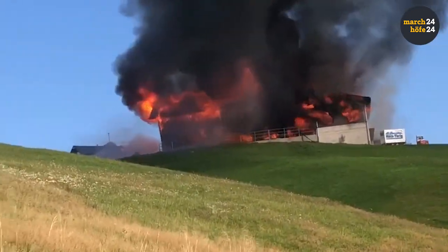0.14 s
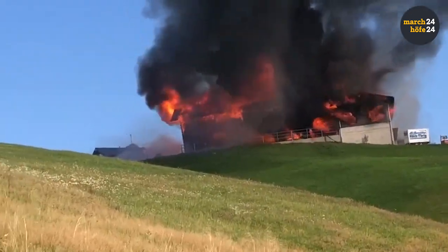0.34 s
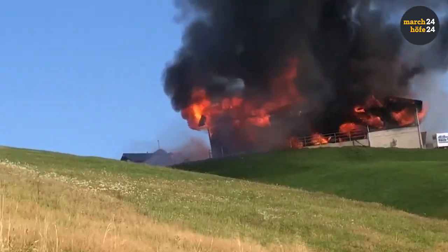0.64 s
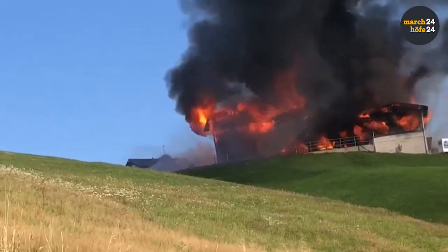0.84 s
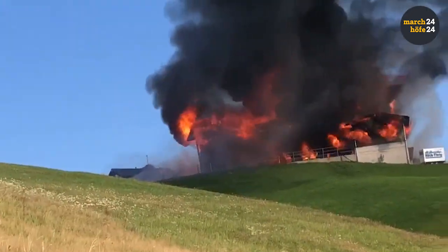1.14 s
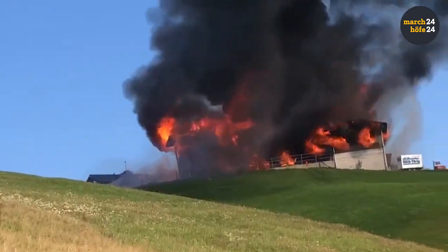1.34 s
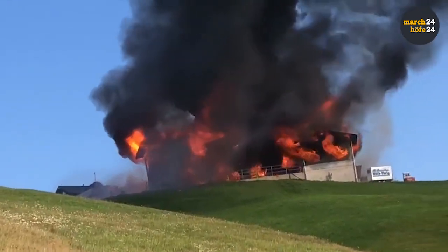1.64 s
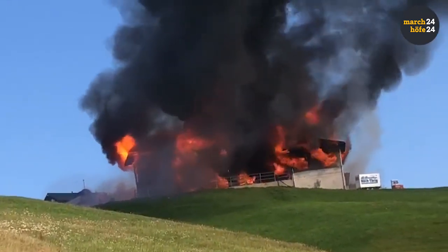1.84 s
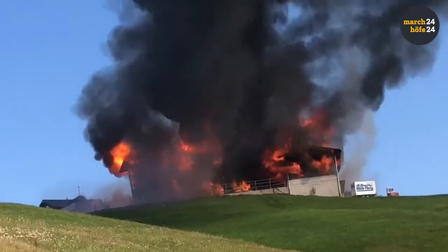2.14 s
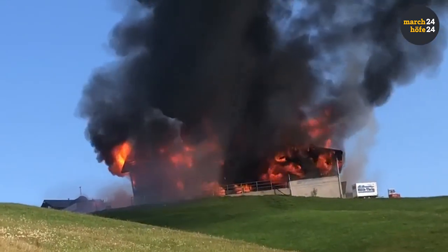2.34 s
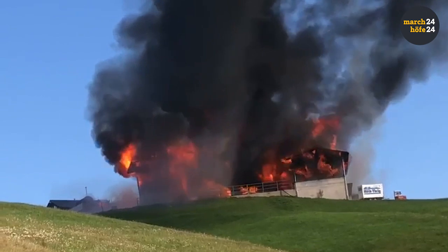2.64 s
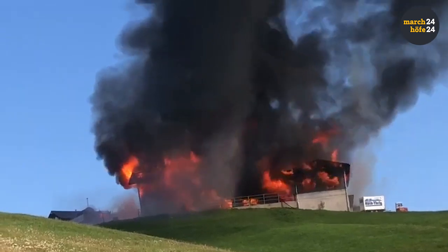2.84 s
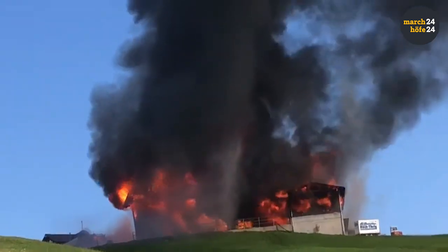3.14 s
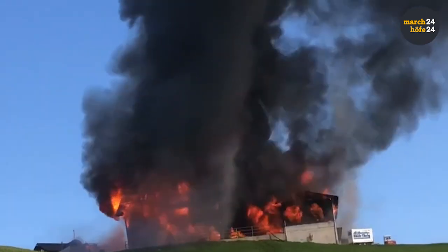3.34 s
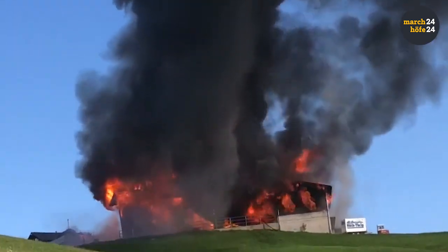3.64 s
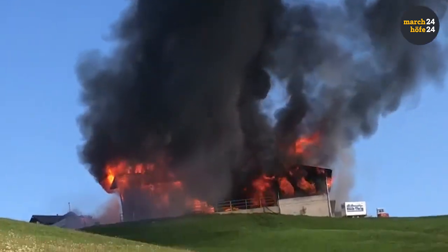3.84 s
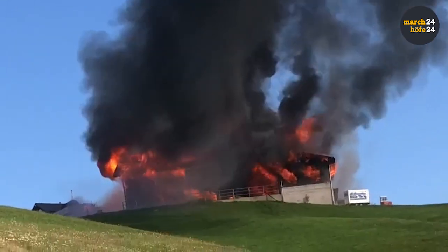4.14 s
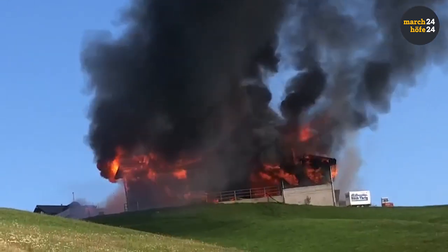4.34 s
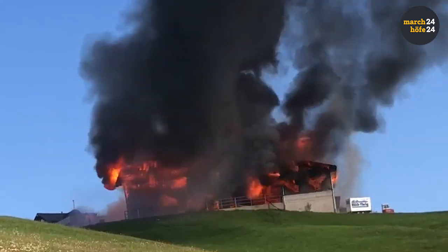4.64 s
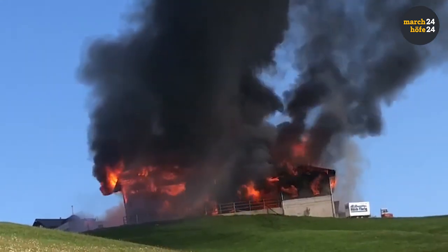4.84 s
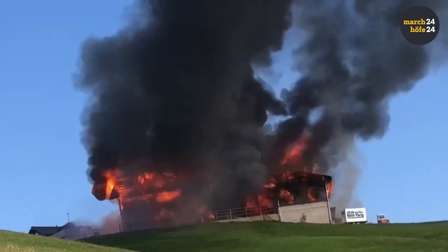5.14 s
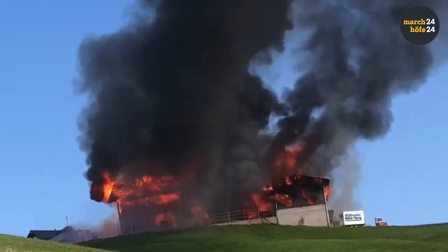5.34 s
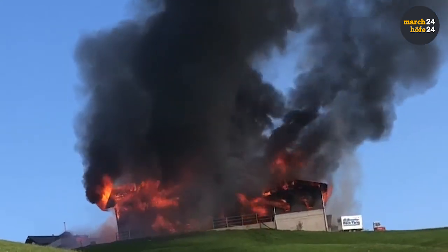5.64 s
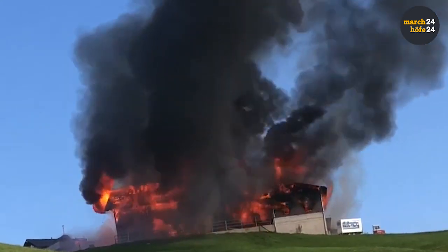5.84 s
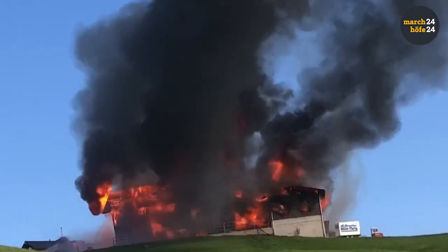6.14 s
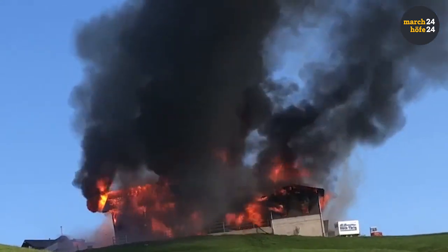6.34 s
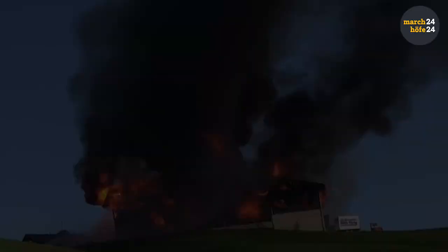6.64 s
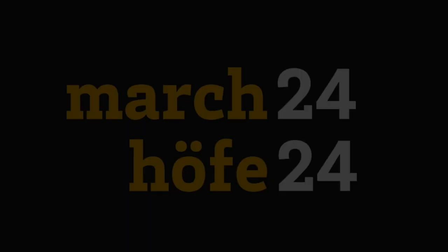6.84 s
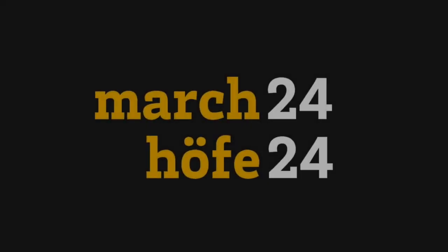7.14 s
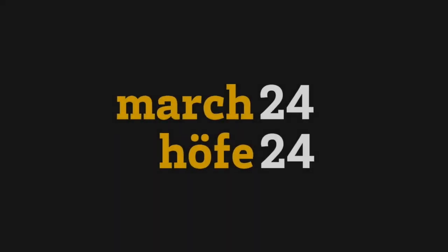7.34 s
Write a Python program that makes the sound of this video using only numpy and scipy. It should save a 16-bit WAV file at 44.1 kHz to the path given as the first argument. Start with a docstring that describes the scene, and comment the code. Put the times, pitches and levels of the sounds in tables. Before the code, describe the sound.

Distant blaze outdoors: steady muffled roar, dense wooden snaps and spark ticks, low engine drone underneath, crackling thickening towards the end, then silence.

```python
"""A barn burns on a hilltop across a meadow. From the start the blaze roars and hisses (flickering
bands of noise and clicks) over a low rumble (resonant noise) and a steady motor (harmonics).
Throughout, timbers pop (clean breaks and ringing sprays) and sparks tick (short treble noise).
Toward the end a rush of fine crackle swells (banded clicks and ringing splinters); then all
fades to silence."""
import sys
import numpy as np
from scipy import signal
from scipy.io import wavfile

SR = 44100
rng = np.random.default_rng(int(sys.argv[2]) if len(sys.argv) > 2 else 0)


def to_wav(s):
    """Save 16-bit WAV."""
    ch = np.atleast_2d(s).T  # columns
    pcm = np.round(np.clip(ch, -1, 1) * 32767)  # PCM
    wavfile.write(sys.argv[1], SR, pcm.astype(np.int16))


N = 330307

# blaze levels: time_s, roar_db, hiss_db
BLAZE_LEVELS = [(0.0, -39, -46.5), (0.49, -43, -49), (1.15, -43.5, -49.5), (2.07, -43.5, -46.5),
                (2.42, -46, -44), (3.19, -43.5, -48.5), (3.86, -41.5, -49), (4.19, -43, -52.5),
                (4.67, -43.5, -49.5), (4.89, -38, -47.5), (5.52, -43, -49), (5.92, -40.5, -50),
                (6.33, -38.5, -50.5), (6.48, -42, -48)]
# relative spectra of roar, hiss and rush: band_hz, density_db_per_hz
ROAR_SPECTRUM = [(140, -35), (230, 0.5), (250, 0), (361, 1), (520, 0), (695, 0.5), (1880, -8),
                 (3380, -12.5), (6000, -22), (7800, -47), (13200, -120)]
HISS_SPECTRUM = [(2500, -6.5), (4500, -11.5), (6300, -8), (8000, -18), (10000, -18), (12000, -24)]
RUSH_SPECTRUM = [(400, -20), (800, 1.5), (1500, 2), (2250, 2), (2900, -0.5), (3600, 0), (5000, -8),
                 (7000, -15.5), (10000, -47.5)]
# louder pops of bursting timber: start_s, length_ms, knock_hz, knock_db, crack_hz, crack_db
TIMBER_POPS = [(0.008, 44.5, 520, -45, 3300, -42.5), (0.023, 4.4, 860, -35, 3000, -31),
               (0.115, 4.9, 500, -30, 2600, -49), (0.137, 35, 840, -38, 2970, -43),
               (0.2657, 1.36, 1300, -26.5, 1860, -22), (0.2668, 1.2, 1050, -25, 1900, -39.5),
               (0.2676, 1.4, 1000, -41, 1900, -27), (0.269, 2.2, 750, -24, 1093, -33),
               (0.344, 5.8, 840, -53, 4460, -37.5), (0.391, 3.6, 750, -30, 3310, -38),
               (0.511, 4.1, 700, -29.5, 3870, -31), (0.589, 1.4, 540, -28, 2870, -50),
               (0.657, 33, 790, -42.5, 3280, -41), (0.828, 35, 799, -43, 4220, -41),
               (0.835, 2.5, 1120, -33, 4100, -34.5), (0.922, 22, 730, -36, 2180, -57),
               (1.022, 37, 770, -37, 2770, -57), (1.046, 1.5, 726, -27, 2590, -30),
               (0.875, 2.6, 800, -31, 2010, -34), (1.112, 3.8, 1000, -38, 2300, -35),
               (1.163, 2.9, 620, -28, 3580, -38), (1.176, 19, 900, -42, 3000, -38.5),
               (1.247, 3, 1410, -39, 2200, -44), (1.333, 36, 940, -39.5, 3520, -37),
               (1.339, 3.8, 900, -43, 2000, -32), (1.3535, 2, 1500, -34, 3260, -28.5),
               (1.513, 1.7, 800, -43, 4360, -34), (1.561, 6.54, 890, -37, 3900, -29.5),
               (1.579, 7.1, 1500, -30.5, 2660, -43), (1.592, 8.2, 1400, -28, 2800, -33),
               (1.604, 13, 1200, -32, 2200, -35), (1.628, 19, 1170, -34, 3180, -35),
               (1.702, 6.3, 536, -32, 3330, -34), (1.773, 5, 990, -46, 3180, -37),
               (1.797, 16, 95, -36, 3000, -60), (1.828, 6.7, 1034, -29, 2480, -37),
               (1.847, 8.8, 704, -36, 3680, -40), (1.984, 18, 800, -35, 2170, -36.5),
               (2.138, 1.8, 901, -50, 3430, -37), (2.171, 8.1, 702, -48, 4200, -36.5),
               (2.218, 21, 990, -33, 2900, -41), (2.221, 3.4, 1240, -30, 2300, -38.5),
               (2.2232, 2, 3300, -27.5, 4740, -28), (2.23, 3.4, 925, -21, 2870, -42),
               (2.235, 5.7, 1200, -30.5, 2200, -39), (2.245, 4.9, 1200, -38, 2300, -44),
               (2.261, 2.1, 1050, -17, 2480, -22), (2.287, 10, 855, -31.5, 2540, -30.5),
               (2.335, 13, 720, -41, 3700, -36), (2.478, 42, 940, -36.5, 3300, -42.5),
               (2.542, 2.84, 800, -41, 3600, -29), (2.551, 3.6, 1190, -28, 3770, -29),
               (2.686, 21, 750, -34.5, 3060, -41), (2.7078, 2.6, 800, -21.5, 3080, -39),
               (2.737, 9, 1900, -31.5, 3300, -37), (2.77, 6.4, 1180, -36, 3970, -35.5),
               (2.953, 23.3, 610, -35.5, 3010, -55), (2.995, 5.4, 855, -31, 3036, -29),
               (3.015, 7, 1010, -29, 1990, -26), (3.022, 3.16, 820, -20.5, 2130, -24.5),
               (3.0245, 5, 1500, -31, 4000, -35), (3.028, 2.5, 995, -34, 2180, -35),
               (3.034, 4.8, 1193, -35, 2200, -37), (3.047, 7.3, 1150, -29, 2000, -42),
               (3.06, 16, 1100, -37.5, 2240, -42), (3.108, 3.2, 665, -28.5, 3680, -31),
               (3.184, 2.2, 904, -36, 3780, -31), (3.218, 16, 1110, -36, 2620, -35),
               (3.2225, 3.24, 870, -23, 2500, -30), (3.228, 4, 1400, -42, 2100, -30),
               (3.271, 3.3, 1304, -30, 2200, -24), (3.275, 5.6, 896, -30, 1700, -35),
               (3.294, 8.5, 1380, -31, 3020, -37), (3.2975, 3.7, 910, -25.5, 2463, -41),
               (3.306, 6, 1200, -43, 2484, -46), (3.326, 3.7, 1000, -48, 4000, -35),
               (3.368, 13, 590, -36, 3000, -51), (3.385, 22, 666, -36, 2920, -54),
               (3.392, 3, 1500, -33.5, 3300, -32), (3.405, 2.8, 680, -21.5, 3000, -45),
               (3.419, 3, 1000, -33, 2000, -30), (3.425, 9, 720, -36.5, 2800, -37),
               (3.491, 29, 680, -32.5, 3130, -47.5), (3.521, 2, 1010, -25, 1690, -25),
               (3.539, 1.2, 1090, -26.5, 3140, -31), (3.586, 9, 1200, -31, 2900, -34),
               (3.598, 4, 1280, -29.5, 2400, -42), (3.607, 6, 1300, -33, 3300, -34),
               (3.627, 2, 1400, -32, 3800, -29.5), (3.637, 2.4, 936, -23.5, 2500, -31.5),
               (3.653, 2.7, 850, -34, 3190, -42), (3.671, 5, 1210, -31, 2820, -31),
               (3.675, 1.74, 1010, -26, 4500, -29), (3.727, 3.4, 770, -39, 3400, -29),
               (3.791, 3.1, 750, -38, 4910, -29.5), (3.802, 8.1, 523, -28.5, 3340, -40),
               (3.814, 8, 573, -33, 3000, -50), (3.834, 4, 1200, -33, 2200, -35),
               (3.838, 12, 1050, -29, 2870, -35), (3.899, 3.6, 796, -28.5, 3000, -42),
               (3.9334, 2, 835, -22.5, 1950, -27), (3.934, 10, 700, -36, 3300, -32),
               (3.939, 5, 1500, -31.5, 2300, -34), (3.948, 5, 850, -29, 3000, -37.5),
               (3.997, 7.6, 1500, -33, 4500, -30), (3.9995, 4.5, 1200, -28, 2580, -25),
               (4.009, 26, 540, -33.5, 3320, -57), (4.044, 9, 900, -36, 2800, -35),
               (4.064, 7.5, 1100, -31, 2760, -34), (4.271, 30.7, 1030, -38, 3420, -38),
               (4.349, 32, 550, -38.5, 2910, -40), (4.454, 21, 740, -35.5, 3440, -50),
               (4.558, 3, 1118, -34.5, 3180, -33), (4.5855, 1.3, 2255, -22.5, 4250, -18.5),
               (4.5856, 0.9, 4800, -28, 5400, -29.5), (4.5875, 1.9, 1099, -29.5, 3600, -23),
               (4.591, 3, 1905, -31.5, 2500, -34), (4.718, 7.6, 930, -32, 3100, -49),
               (4.7284, 1.8, 350, -21, 600, -31), (4.789, 19, 710, -33, 3320, -38),
               (4.795, 2.2, 820, -35, 3120, -31), (4.991, 2.9, 790, -30, 2790, -25),
               (5.101, 3.08, 2000, -35, 3280, -28), (5.161, 4, 2300, -30, 3500, -34),
               (5.178, 5, 1900, -31.5, 3000, -30.5), (5.195, 3.27, 900, -44.5, 2200, -27),
               (5.212, 3.7, 2100, -26, 3700, -34), (5.219, 3, 2300, -27, 3500, -31),
               (5.233, 4.6, 700, -44, 3580, -28), (5.243, 4.4, 2300, -31, 3580, -35),
               (5.268, 4.7, 2300, -29, 3600, -34), (5.288, 3.3, 795, -28, 2534, -40),
               (5.315, 4, 2300, -25, 3917, -30), (5.325, 4, 1000, -31, 2300, -35),
               (5.487, 7, 2200, -28, 3300, -31.5), (5.549, 5.86, 1150, -28.5, 2940, -36),
               (5.801, 4, 1850, -24, 3500, -37), (5.864, 3, 1003, -26, 2200, -31),
               (5.87, 5, 1500, -31, 2200, -29), (5.918, 3, 1400, -35, 3700, -30),
               (5.935, 6, 1100, -28.5, 2300, -30.5), (5.976, 8, 1400, -32, 2100, -30),
               (6.028, 14, 1700, -28, 2660, -30), (6.069, 2.1, 1130, -21.5, 2250, -23),
               (6.078, 23, 900, -33, 1900, -33), (6.114, 4.2, 1500, -25, 2800, -30),
               (6.21, 6, 700, -27.5, 1984, -37), (6.225, 31, 754, -27, 2000, -39),
               (6.258, 33, 900, -33, 2400, -37), (6.277, 5, 2600, -30, 3300, -32),
               (6.305, 25, 1120, -34.5, 2490, -33), (6.319, 9, 1200, -29, 1700, -30),
               (6.34, 3.4, 890, -23, 3170, -28), (6.445, 27, 1000, -31, 2600, -41)]
# spitting sparks: time_s, peak_db
SPARK_TICKS = [(0.833, -33), (0.873, -39), (1.19, -39), (1.353, -34), (1.5603, -32), (2.1476, -35),
               (2.218, -30), (2.2907, -31), (2.702, -34.5), (2.773, -43), (2.9143, -42), (2.995, -39),
               (3.024, -41), (3.185, -38), (3.223, -39), (3.327, -44), (3.392, -46), (3.43, -45),
               (3.506, -42), (3.54, -42), (3.674, -40), (3.79, -27), (3.936, -35), (4.0, -31),
               (4.4675, -33), (4.585, -35.5), (4.8409, -40), (4.8993, -42), (6.0148, -37)]
# rush of fine crackle: time_s, level_db
RUSH_LEVELS = [(0.0, -48.5), (0.59, -50.5), (1.43, -47.5), (1.7, -42.5), (2.85, -45.5), (3.3, -43),
               (4.15, -38), (4.62, -39), (5.2, -35), (5.77, -34.5), (5.9, -32), (6.05, -31), (6.17, -33),
               (6.28, -32), (6.39, -35), (6.45, -34.5), (6.48, -36)]
# pitches dealt to the splinters in the rush: pitch_hz
SPLINTER_PITCHES_HZ = [1150, 1500, 1900, 2250, 2500, 2900, 3400, 3560, 3940, 4500]
# humps of the flames' rumble: center_hz, width_hz, base_level_db
RUMBLE_HUMPS = [(29.7, 20, -74.5), (49.4, 7.5, -53.5), (71.4, 32, -54), (101, 10, -57), (134, 55, -59),
                (238, 41, -65.5)]
# swell of the whole rumble: time_s, change_db
RUMBLE_SWELL = [(0.0, -0.5), (1.2, -1), (2.5, 2), (4.4, 0.5), (5.3, 1.5), (6.5, 0)]
# motor harmonics: multiple, base_level_db (rms)
MOTOR_HARMONICS = [(1, -40), (2, -56), (3, -48.5), (4, -55), (5, -61.5)]
# swell of the motor's overtones: time_s, change_db
OVERTONE_SWELL = [(0.0, 0.5), (1.0, 0), (1.9, -4.5), (2.3, -0.5), (4.5, 1.5), (6.5, 1)]
# closing fade: time_s, gain
FADE_GAINS = [(6.47, 0.93), (6.56, 0.42), (6.68, 0.16), (6.733, 0.0)]

CLEAN_BELOW_MS, BREAK_CYCLES = 2.53, 1.2  # shorter pops are mostly clean; longest spread of a break
SMALL_POPS_PER_S, SMALL_KNOCK_MIN_DB, SMALL_CRACK_MIN_DB = 70.0, -43, -44
TICK_SPREAD_S, TICK_HZ, TICK_WIDTH_HZ = .0018, 6000, 2100
SPLINTERS_PER_S, SPLINTER_CYCLES, SIZZLE_REL_DB = 500, 7.0, -9.5  # level relative to the rush
MOTOR_HZ = 69.3
CUTOFF_HZ = 11600


def from_db(db):
    """Decibels to gain."""
    return 10 ** (np.asarray(db) / 20)


def rms_one(x):
    """Scaled to rms 1."""
    return x / np.sqrt(np.mean(x ** 2) + 1e-20)


def in_time(rows):
    """Each column of a table, joined by straight lines in time."""
    time_s, *columns = np.transpose(rows)
    return [np.interp(np.arange(N) / SR, time_s, column) for column in columns]


def drift(corner_hz):
    """Slow chance: noise at every 40th sample through a double one-pole low-pass; rms 1."""
    r = np.exp(-80 * np.pi * corner_hz / SR)
    noise = rng.standard_normal(N // 40 + 2002)
    slow = signal.lfilter([1], [1, -2 * r, r * r], noise)[2000:]  # settled part
    return np.interp(np.arange(N) / 40, np.arange(len(slow)), rms_one(slow))


def resonate(x, hz, width_hz):
    """One two-pole resonance, gain about 1 on top."""
    r = np.exp(-np.pi * width_hz / SR)
    feedback = [1, -2 * r * np.cos(2 * np.pi * hz / SR), r * r]
    return signal.lfilter([(1 - r * r) / 2, 0, (r * r - 1) / 2], feedback, x)


def resonate_twice(x, hz, width_hz):
    """Two equal resonances in series, for steeper skirts."""
    return resonate(resonate(x, hz, width_hz), hz, width_hz)


def banded(source, spectrum, shared_db, own_db, flicker_hz):
    """Third-octave bands of two unrelated sources in turn, flickering together and apart; rms 1."""
    out = 0
    together = drift(flicker_hz)
    edges_hz = 200 * 2 ** (np.arange(19) / 3)
    table = np.array(spectrum)
    for k, (low_hz, high_hz) in enumerate(zip(edges_hz, edges_hz[1:])):
        sos = signal.butter(2, [low_hz, high_hz], "band", fs=SR, output="sos")
        band = signal.sosfilt(sos, source[k % 2])
        level_db = np.interp(np.log(low_hz * high_hz) / 2, np.log(table[:, 0]), table[:, 1])
        flicker_db = shared_db * together + own_db * drift(flicker_hz)
        out = out + from_db(level_db + flicker_db) * band
    return rms_one(out)


def grains(per_s, spread_db):
    """Two trains of random clicks, most small, a few large."""
    sizes = from_db(spread_db * np.minimum(rng.exponential(1, (2, N)), 5))
    signs = rng.choice([-1, 1], (2, N))
    return sizes * signs * (rng.random((2, N)) < per_s / SR) + 1e-18


def blaze_roar():
    """Turbulent flame: banded noise with a slight flicker."""
    noise = rng.standard_normal((2, N))
    roar = banded(noise, ROAR_SPECTRUM, shared_db=.5, own_db=.8, flicker_hz=12.0)
    return from_db(in_time(BLAZE_LEVELS)[0]) * roar


def blaze_hiss():
    """Treble of the blaze: dense clicks in bands that flicker mostly together."""
    clicks = grains(9000, 2.2)
    hiss = banded(clicks, HISS_SPECTRUM, shared_db=2.5, own_db=1.5, flicker_hz=9.2)
    return from_db(in_time(BLAZE_LEVELS)[1]) * hiss


def ragged(count):
    """Noise whose size jumps about, two rows a pop."""
    size = (count, 2, 3000)
    return rng.standard_normal(size) * rng.exponential(1, size) ** 0.32


def ringing_spray(spray, hz, width_hz, top_hz):
    """Ragged noise rings at the wood's pitch, with little far above the ring; rms 1."""
    ring = resonate_twice(spray, hz, width_hz)
    return rms_one(signal.lfilter(*signal.butter(4, top_hz, fs=SR), ring))


def clean_break(late_s, hz, length_ms):
    """A push of air, rounded by the distance: a few cycles at most under a bell curve; rms 1."""
    spread_s = np.clip(length_ms / 3000, .45 / hz, BREAK_CYCLES / hz)
    return rms_one(np.cos(2 * np.pi * hz * late_s) * np.exp(-(late_s / spread_s) ** 2 / 2))


def bursts(rows, noise):
    """Clean break in a ragged spray: a low knock of wood, a higher crack of fibres, a scattered tail."""
    lead, count = 150, noise.shape[-1]  # samples of room ahead of each pop; samples a pop
    out = np.zeros(N + count)
    since_s = (np.arange(count) - lead) / SR
    t = np.maximum(since_s, 0)
    for (start_s, length_ms, knock_hz, knock_db, crack_hz, crack_db), sprays in zip(rows, noise):
        length_ms = np.clip(length_ms, .5, 45)
        age = t / (length_ms / 1000)
        swell = age ** 1.8 * np.exp(-2.3 * age ** 2)
        tail = 0.092 * np.minimum(age, 1) * np.exp(-t / 0.024)
        low, high = sprays * (swell + tail)
        clean_share = 1 / (1 + (length_ms / CLEAN_BELOW_MS) ** 3)
        late_s = since_s - .6 * length_ms / 1000
        # sets the energy by the pop's length
        length_gain = np.sqrt(length_ms / 2000 * SR / count)
        knock = low, knock_hz, knock_db, 0.8, 2.2
        crack = high, crack_hz, crack_db, 0.6, 1.8
        for spray, hz, db, width_share, reach in (knock, crack):
            width_hz = width_share * hz * (1 + length_ms / 60)  # long sputters spread wider
            ring = ringing_spray(spray, hz, width_hz, top_hz=min(reach * hz, 9000))
            snap = clean_break(late_s, hz, length_ms)
            pop = np.sqrt(clean_share) * snap + np.sqrt(1 - clean_share) * ring
            out[round(start_s * SR):][:count] += from_db(db) * pop * length_gain
    return out[lead:][:N]


def timber_pops():
    """The louder pops and sputters of bursting timber."""
    return bursts(TIMBER_POPS, ragged(count=len(TIMBER_POPS)))


def small_pops():
    """Lesser pops at random moments, pitches and lengths."""
    draw = rng.random((600, 6))
    start_s = np.cumsum(-np.log(1 - draw[:, 0])) / SMALL_POPS_PER_S
    knock_db = SMALL_KNOCK_MIN_DB - 4.0 * np.log(1 - .85 * draw[:, 1])
    crack_db = SMALL_CRACK_MIN_DB - 2.1 * np.log(1 - .9 * draw[:, 2])
    length_ms = 2.0 * 6.0 ** draw[:, 3]
    knock_hz = 450 * 3.36 ** draw[:, 4]
    crack_hz = 1700 * 3.3 ** draw[:, 5]
    rows = np.transpose([start_s, length_ms, knock_hz, knock_db, crack_hz, crack_db])
    return bursts(rows[start_s < N / SR], ragged(count=600))


def spark_ticks():
    """Spitting sparks: a few milliseconds of treble noise each, under a bell curve."""
    out, t = np.zeros(N), np.arange(400) / SR
    bell = np.exp(-((t - .004) / TICK_SPREAD_S) ** 2)
    noise = rng.standard_normal((len(SPARK_TICKS), len(t)))
    for (time_s, peak_db), spray in zip(SPARK_TICKS, noise):
        tick = resonate(spray * bell, TICK_HZ, TICK_WIDTH_HZ)
        out[round((time_s - .0025) * SR):][:len(t)] += from_db(peak_db) * tick / np.abs(tick).max()
    return out


def sizzle():
    """Single splinters stand out of the rush, each ringing a few cycles; rms 1."""
    clicks = grains(SPLINTERS_PER_S, 3.0)[0]
    dealt = rng.integers(len(SPLINTER_PITCHES_HZ), size=N)
    out = 0
    for k, hz in enumerate(SPLINTER_PITCHES_HZ):
        width_hz = hz / SPLINTER_CYCLES * 2
        out = out + rms_one(resonate_twice(clicks * (dealt == k), hz, width_hz))
    return rms_one(out)


def crackle_rush():
    """Swelling fine crackle: banded clicks with ringing splinters among them."""
    clicks = grains(5000, 2.9)
    fine = banded(clicks, RUSH_SPECTRUM, shared_db=.7, own_db=1.2, flicker_hz=20.0)
    return from_db(in_time(RUSH_LEVELS)[0]) * (fine + from_db(SIZZLE_REL_DB) * sizzle())


def rumble():
    """Low turbulence of the flames: noise gathered in a few humps."""
    out = 0
    for hz, width_hz, db in RUMBLE_HUMPS:
        out = out + from_db(db) * rms_one(resonate_twice(rng.standard_normal(N), hz, width_hz))
    return from_db(in_time(RUMBLE_SWELL)[0]) * out


def motor():
    """Steady harmonics of the firing rate, each wavering a little on its way over the field."""
    phase = 2 * np.pi * MOTOR_HZ * np.arange(N) / SR
    swell_db = in_time(OVERTONE_SWELL)[0]
    out = 0
    for k, db in MOTOR_HARMONICS:
        level_db = db + (k > 1.5) * swell_db + 1.3 * drift(9.6)  # swell spares the fundamental
        offset = 2 * np.pi * rng.random() + 0.11 * drift(1.4)
        out = out + np.sqrt(2) * from_db(level_db) * np.sin(round(k) * phase + offset)
    return out


def scene():
    """All sources, heard from across the meadow."""
    blaze = blaze_roar() + blaze_hiss()
    pops = timber_pops() + small_pops() + spark_ticks()
    return (blaze + pops + crackle_rush() + rumble() + motor())[None]


def record(dry):
    """The air and microphone dull the top; the sound fades out; the top is cut."""
    dull = signal.sosfilt(signal.butter(2, 9000, fs=SR, output="sos"), dry)
    steep = signal.ellip(12, .5, 75, CUTOFF_HZ, fs=SR, output="sos")
    return signal.sosfilt(steep, dull * in_time(FADE_GAINS)[0])


dry = scene()
out = record(dry)
to_wav(out)
```